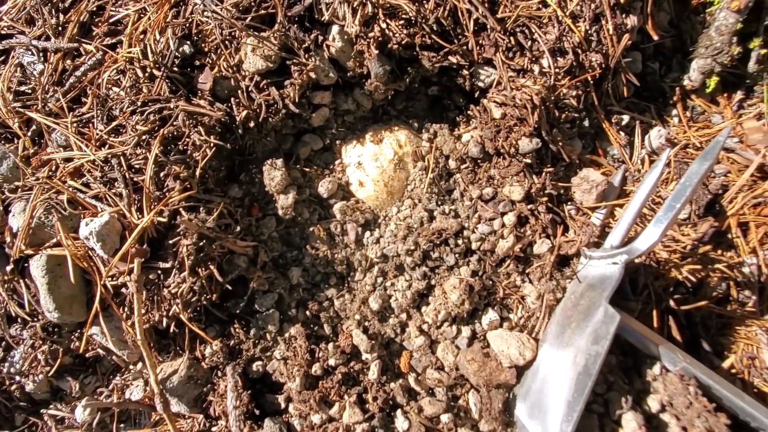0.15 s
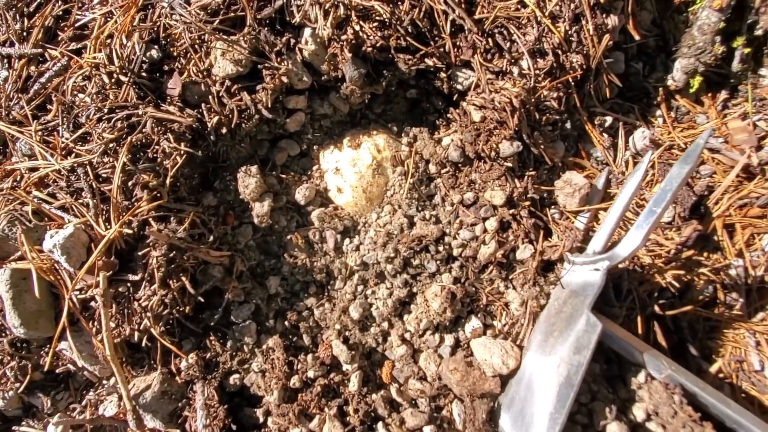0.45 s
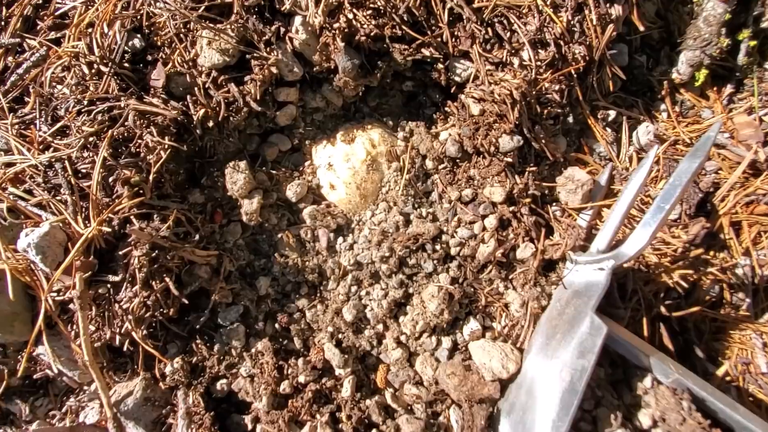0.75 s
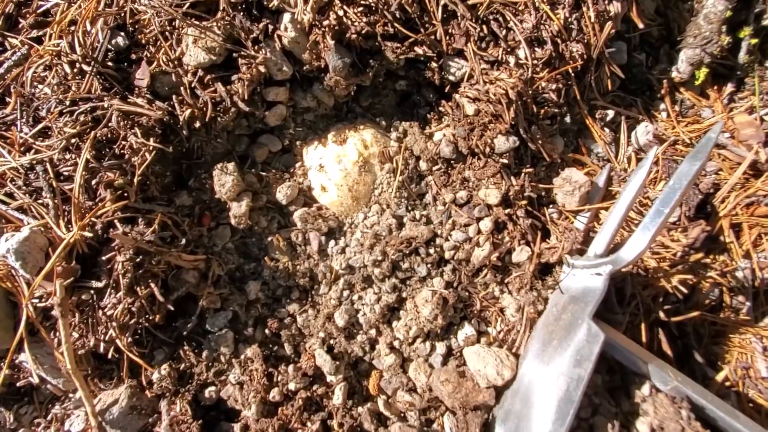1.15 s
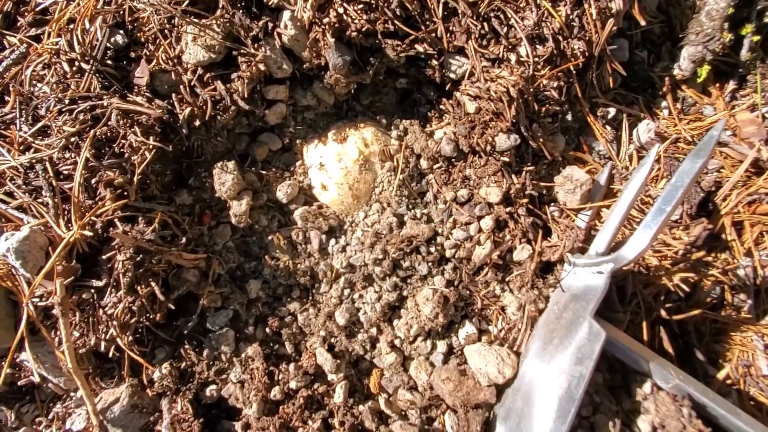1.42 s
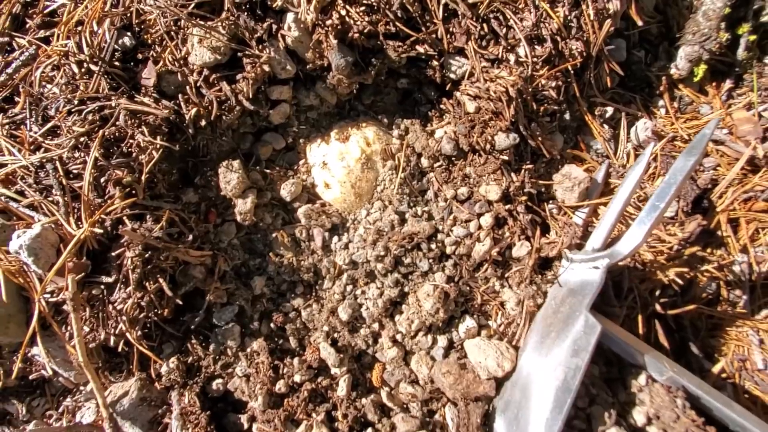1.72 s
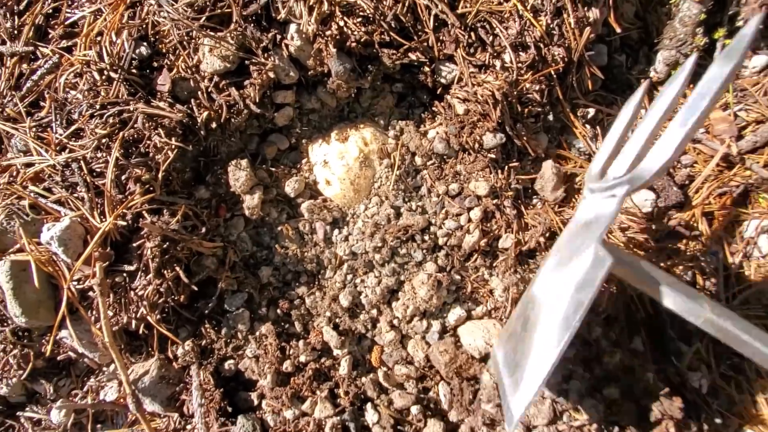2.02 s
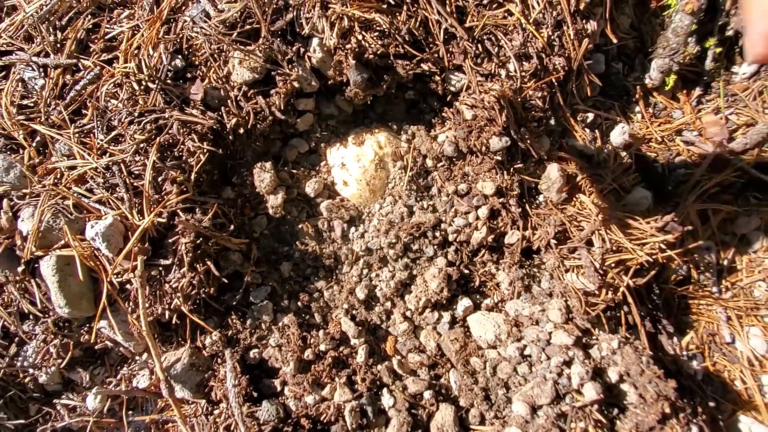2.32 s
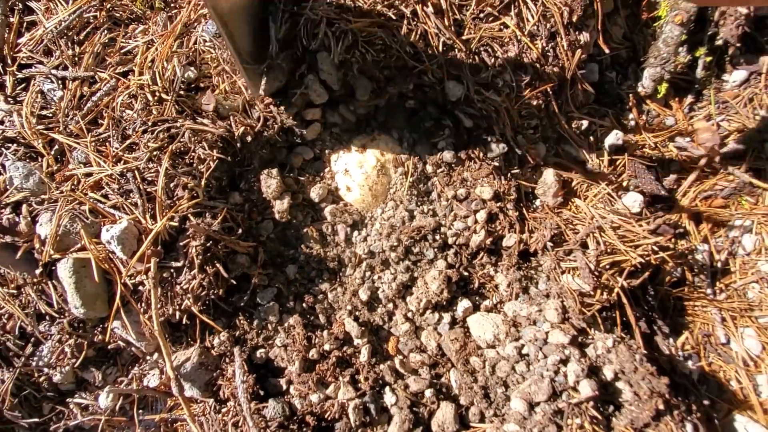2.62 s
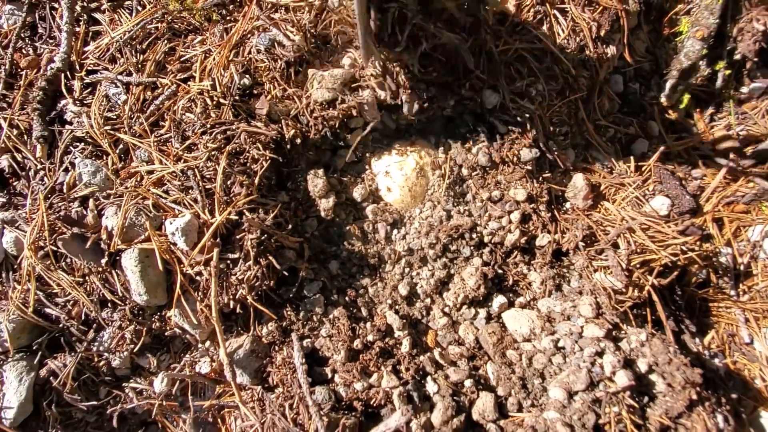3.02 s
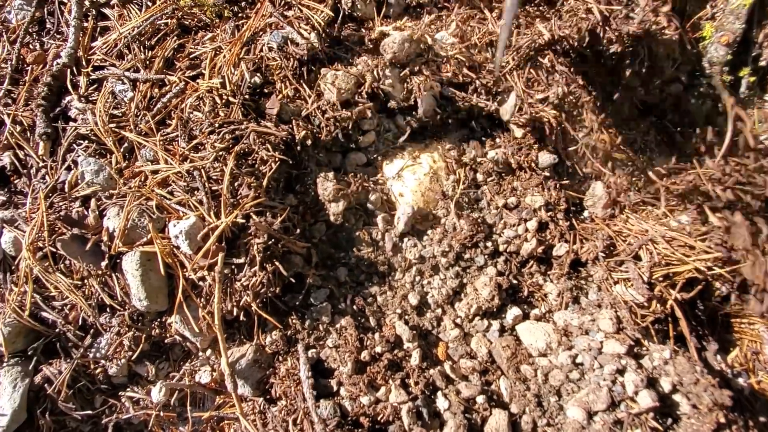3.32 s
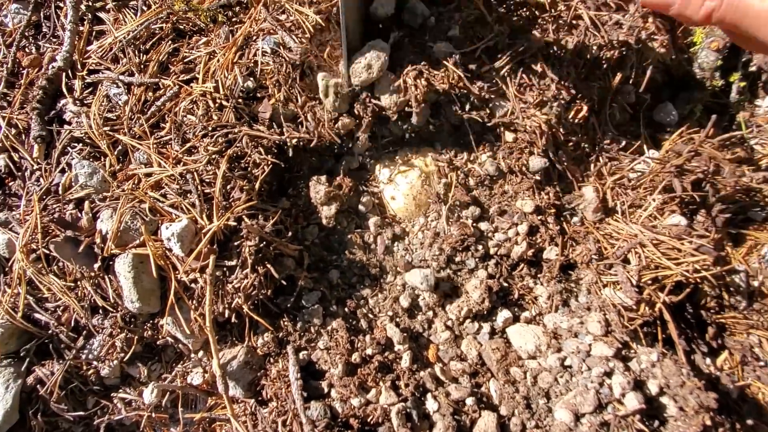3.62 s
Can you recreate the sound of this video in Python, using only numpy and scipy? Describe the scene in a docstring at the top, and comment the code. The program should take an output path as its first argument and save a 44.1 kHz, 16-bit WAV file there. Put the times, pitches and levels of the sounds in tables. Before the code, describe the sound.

Metal garden tool crunches and scrapes in stony soil, following quiet shuffling and one clink.

```python
"""Scraping the forest floor

Close to the ground outdoors: someone shifts on gritty soil at the right, made of dense filtered clicks and snaps.
The hand-held microphone takes low bumps, which are short swelling sine cycles, over quiet filtered noise.
A steel hand tool is lifted, knocked, then scraped through grit and dry needles at the left:
uneven clicks and cracks drive the steel's decaying modes, so that it rings as it goes."""
import sys
import numpy as np
from scipy import signal
from scipy.fft import rfft, irfft, next_fast_len
from scipy.io import wavfile
from scipy.ndimage import uniform_filter1d

SR = 44100
rng = np.random.default_rng(int(sys.argv[2]) if len(sys.argv) > 2 else 0)


def unload_wav(signal):
    """Save mono or channel-first audio to the path in sys.argv[1] as 16-bit WAV at rate SR, clipped to [-1, 1]."""
    wavfile.write(
        sys.argv[1],
        SR,
        np.round(np.clip(np.atleast_2d(signal).T, -1, 1) * 32767).astype(np.int16),
    )


def makeup_ratio(level_db):
    """Linear amplitude ratio for a level in decibels (20 dB per factor of ten)."""
    decades = np.asarray(level_db, float) / 20
    return 10 ** decades


N = 165375  # samples
TOOL_LAG = 3  # samples by which the left microphone hears the tool first
TOOL_PAN_DB = 7  # left over right


def evened(x):
    """Scales to rms 1."""
    return x / np.sqrt(np.mean(x ** 2) + 1e-20)


def peak(x):
    """Scales to peak 1."""
    return x / abs(x).max()


def colour(x, points):
    """Causal minimum-phase filter with the given spectrum, scaled to unit energy."""
    f, db = np.transpose(points)
    hz = abs(np.fft.fftfreq(4096, 1 / SR))
    wanted_db = np.interp(np.log(hz + 1), np.log(f + 1), db)
    log_gain = np.log(makeup_ratio(np.maximum(wanted_db, -100)))
    taps = np.fft.ifft(np.exp(signal.hilbert(log_gain))).real[::-1]
    taps = np.roll(taps, 1)[:2048]
    return signal.oaconvolve(x, taps / np.linalg.norm(taps))[:len(x)]


def curve(table, order):
    """One column of a table, joined by straight lines in time."""
    rows = np.array(table)
    return np.interp(np.arange(N) / SR, rows[:, 0], rows[:, order])


def level(table):
    """Gain over time from the first two columns (seconds, dB), silent outside the table."""
    t = np.arange(N) / SR
    inside = (t >= table[0][0]) & (t <= table[-1][0])
    return makeup_ratio(curve(table, order=1)) * inside


def ring(modes):
    """Half a second of decaying sines, one for each mode of a struck body."""
    t = np.arange(SR // 2) / SR
    return sum(makeup_ratio(db - 60 * t / t60) * np.sin(2 * np.pi * hz * t) for hz, db, t60 in modes)


def burst(t60):
    """A crack: noise dying fast."""
    t = np.arange(4000) / SR
    return rng.standard_normal(len(t)) * makeup_ratio(-60 * t / t60)


def grains(per_s, spread_db, hiss, clump_db=5):
    """Sparse clicks of very uneven size, arriving in clumps over a fine hiss."""
    clump = makeup_ratio(clump_db * evened(uniform_filter1d(rng.standard_normal(N), 300)))
    size = makeup_ratio(spread_db * np.minimum(rng.exponential(1, N), 5))
    size = size * rng.choice([-1, 1], N)
    clicks = size * (rng.random(N) < per_s * clump / SR)
    return evened(evened(clicks) + hiss * clump * rng.standard_normal(N))


def add(mix, s, sound):
    """Mixes a sound in at a time."""
    part = mix[max(round(s * SR), 0):][:len(sound)]
    part += sound[:len(part)]


def sides(pan_db):
    """Left and right gains around the middle level; positive leans left."""
    left = makeup_ratio(np.asarray(pan_db) / 2)
    return np.array([left, 1 / left]) * 2 / (left + 1 / left)


def add_panned(pair, s, sound, pan_db):
    """Mixes a sound into both sides at a time."""
    for mix, gain in zip(pair, sides(pan_db)):
        add(mix, s, gain * sound)


def spread(x, gains, lag_s):
    """Direct sound, a part scattered differently to each side, and the ground echo; positive lag delays the left."""
    apart = .25  # share that differs between microphones
    echo_db, echo_t60_s = -13, .06
    t = np.arange(4000) / SR
    out = []
    for gain, late in zip(gains, (max(lag_s, 0), max(-lag_s, 0))):
        near = rng.standard_normal(len(t)) * makeup_ratio(-60 * t / 0.0064)
        echo = rng.standard_normal(len(t)) * makeup_ratio(-60 * t / echo_t60_s)
        taps = apart * near / np.linalg.norm(near) + makeup_ratio(echo_db) * echo / np.linalg.norm(echo)
        taps[0] += 1
        taps = np.r_[np.zeros(round(late * SR)), taps / np.linalg.norm(taps)]
        out.append(gain * signal.oaconvolve(x, taps)[:N])
    return np.array(out)


# Colour of the quiet air. Each row: frequency in Hz, relative level in dB per Hz.
AIR_COLOUR = [(15, -38), (25, 0.5), (76, 0.5), (591, -13.5), (714, -9.5), (1020, -19.5), (6560, -27),
              (7310, -30), (8360, -26), (13200, -33.5), (16000, -42)]


def air():
    """The quiet of the forest floor: steady coloured noise, unrelated at the two microphones."""
    return makeup_ratio(-71) * np.array([evened(colour(rng.standard_normal(N), AIR_COLOUR)) for _ in range(2)])


def rumble():
    """A faint lumpy rumble: low noise whose level wanders, almost all at the right."""
    lumps = makeup_ratio(5.2 * evened(uniform_filter1d(rng.standard_normal(N), 2500)))
    low = colour(rng.standard_normal(N), [(20, -40), (62 * 0.24, -8), (62, 0), (62 * 2.3, -12), (400, -50)])
    return makeup_ratio(-69) * evened(low * lumps) * sides(-31)[:, None]


def low_cycles(rows, pan_db):
    """A few low cycles of wavering pitch that swell and die."""
    rise, wobble = 0.19, 0.26  # swell time as a share of the length; pitch sway as a share of the pitch
    out = np.zeros((2, N))
    for start, db, hz, length in rows:
        u = np.arange(0, 2, 1 / SR / length)  # time in lengths
        sway = np.sin(2 * np.pi * (1.11 * u + rng.random()))
        turns = np.cumsum(hz * (1 + wobble * sway)) / SR
        shape = (u / rise) * np.exp(1 - u / rise)
        shape = shape * np.minimum((u[-1] - u) / .3, 1)  # fades to nothing at the end
        add_panned(out, start, makeup_ratio(db) * shape * np.sin(2 * np.pi * turns), pan_db)
    return out


# Low bumps from the hand. Each row: start in seconds, level in dB, middle pitch in Hz,
# length in seconds (the sound lasts two lengths).
HAND_BUMPS = [(0.153, -49.5, 72.5, 0.038), (0.27, -44, 83, 0.049), (0.498, -49, 91, 0.098),
              (0.765, -51.5, 71, 0.038), (0.863, -52.5, 59.3, 0.039), (0.912, -53, 62, 0.053),
              (1.023, -43, 62, 0.036), (1.491, -48, 63, 0.094), (1.576, -51, 54.4, 0.064),
              (1.743, -47.5, 62, 0.08), (2.498, -45.5, 68, 0.087), (2.576, -48, 59, 0.067),
              (2.651, -50, 54, 0.098)]


def hand_bumps():
    """The hand knocks the right microphone, which gives short low swells."""
    return low_cycles(HAND_BUMPS, pan_db=-35)


# Jolts of the tool through the ground. Each row: start in seconds, level in dB, middle pitch in Hz,
# length in seconds (the sound lasts two lengths).
GROUND_JOLTS = [(2.271, -33, 73, 0.065), (3.02, -50, 77, 0.049), (3.086, -34.5, 113, 0.02),
                (3.116, -42, 89, 0.044), (3.174, -34.5, 81.6, 0.044), (3.474, -49, 62, 0.078),
                (3.555, -43.5, 88.5, 0.033), (3.587, -45.5, 63.4, 0.11), (3.683, -37, 84, 0.082),
                (3.703, -31.5, 89.6, 0.055)]


def jolts():
    """The ground carries the tool's jolts to both microphones as short low swells."""
    return low_cycles(GROUND_JOLTS, pan_db=-2)


# Clods giving way. Each row: start in seconds, peak level in dB, left over right in dB.
CLOD_THUDS = [(0.001, -29, -38), (0.267, -43.5, 4), (0.475, -54, -30), (1.022, -54.5, -30),
              (1.148, -48, -39), (1.98, -45, -32), (2, -39.5, -38), (2.264, -30.5, -31), (2.943, -47, -17),
              (3.022, -48.5, -21), (3.087, -35.5, -5), (3.128, -36.5, -10), (3.401, -60, -28),
              (3.556, -32.5, 1.5), (3.694, -32.5, -3), (3.735, -32.5, 3)]
# Dull colour of breaking clods. Each row: frequency in Hz, relative level in dB.
CLOD_COLOUR = [(100, -12.5), (180, 4.5), (450, 1.5), (900, -8.5), (1800, -25), (4000, -31)]


def thuds():
    """Clods give way with a dull thud: filtered noise dying fast."""
    out = np.zeros((2, N))
    for s, db, pan_db in CLOD_THUDS:
        add_panned(out, s, makeup_ratio(db) * peak(colour(burst(0.055), CLOD_COLOUR)), pan_db)
    return out


# Dry needles rustling back into place. Each row: time in seconds, level in dB.
NEEDLE_EFFORT = [(.26, -95), (.29, -68), (.33, -70), (.45, -72), (.55, -91), (1.25, -88), (1.44, -76),
                 (1.55, -81), (1.665, -85), (1.675, -64.5), (1.75, -66.5), (1.86, -72.5), (1.88, -68.5),
                 (2.05, -63), (2.12, -54), (2.135, -67), (2.19, -70), (2.22, -58), (2.255, -79),
                 (2.28, -51), (2.37, -65), (2.40, -75), (2.52, -97)]
# Bright colour of the needles. Each row: frequency in Hz, relative level in dB per Hz.
NEEDLE_COLOUR = [(880, -54), (1500, -21), (4500, -12.5), (6000, -3), (7540, -17), (8160, -4.5), (10800, 3),
                 (16000, -7.5)]


def needles():
    """Dry needles rustle back into place: fine bright clicks, separate at each side."""
    pair = [evened(colour(grains(4000, 3.4, 0.71, clump_db=4.0), NEEDLE_COLOUR)) for _ in range(2)]
    return pair * level(NEEDLE_EFFORT)


# Weight shifting over soil. Each row: time in seconds, effort in dB.
SHUFFLE_EFFORT = [(0, -37.5), (.03, -66.5), (.07, -82), (.26, -107), (.29, -55), (.33, -67), (.38, -57),
                  (.45, -65.5), (.49, -58), (.55, -55), (.61, -39.5), (.66, -44.5), (.76, -49), (.84, -62),
                  (.87, -70.5), (1.0, -89), (1.15, -80), (1.18, -65.5), (1.2, -61.5), (1.216, -68),
                  (1.232, -62), (1.25, -89), (1.65, -103), (1.9, -74), (2.01, -60), (2.08, -65.5),
                  (2.25, -101), (2.28, -58), (2.36, -62.5), (2.5, -95)]
# Twigs and grit snapping under that weight. Each row: start in seconds, peak level in dB.
WEIGHT_SNAPS = [(0.001, -33), (0.269, -45), (0.287, -45), (0.478, -33), (0.503, -40), (0.577, -45),
                (0.898, -53.5), (1.021, -52), (1.11, -60), (1.148, -47), (1.176, -53), (1.229, -55)]
# Dull colour of soil under weight. Each row: frequency in Hz, relative level in dB per Hz.
SOIL_COLOUR = [(80, -19.5), (200, -6), (500, -1.5), (1500, -5.5), (2600, -4.5), (4300, -14.5), (5700, -27),
               (8300, -30), (10500, -27), (16000, -38)]


def shuffle():
    """Dense dull grit under weight with single snaps; the left microphone hears it weaker and later."""
    x = level(SHUFFLE_EFFORT) * evened(colour(grains(9000, 2.4, 1.6, clump_db=2.0), SOIL_COLOUR))
    for s, db in WEIGHT_SNAPS:
        add(x, s, makeup_ratio(db) * peak(colour(burst(.007), SOIL_COLOUR)))
    return spread(x, sides(-15), lag_s=23 / SR)


# Modes of the tool held free in the air. Each row: frequency in Hz, level in dB, decay to -60 dB in seconds.
FREE_MODES = [(479, 0, .09), (824, -9, .08), (1308, -25, 2.5), (1367, -20, 1.8), (2299, -3, .3),
              (3300, -8, .04), (9000, -6, .03), (12250, -12, .12), (12510, -2, .08), (13850, 1, .2),
              (14030, -24, 1)]
# Dull wooden part of the knock. Each row: frequency in Hz, relative level in dB.
WOOD_COLOUR = [(120, -5.5), (250, -4.5), (800, -1.5), (1500, -53), (4000, -18)]


def knock():
    """One knock of the tool held free: a crack, a dull wooden body and the long ring of undamped steel."""
    start_s, ring_db, crack_db, wood_db = 2.2665, -37, -30, -36.5
    bell, hit = np.zeros((2, N))
    add(bell, start_s, makeup_ratio(ring_db) * ring(FREE_MODES))
    add(hit, start_s, makeup_ratio(crack_db) * peak(colour(burst(0.079), GRIT_COLOUR)))
    add(hit, start_s, makeup_ratio(wood_db) * peak(colour(burst(0.27), WOOD_COLOUR)))
    gains = sides(8.5)
    bells = gains[:, None] * np.array([bell, np.roll(bell, TOOL_LAG)])
    return spread(hit, gains, -TOOL_LAG / SR) + bells


# Colour of grit along the blade. Each row: frequency in Hz, relative level in dB per Hz.
GRIT_COLOUR = [(60, -16), (150, -10), (400, -15.5), (800, -12.5), (1500, -16.5), (2400, -11), (3300, -4),
               (5900, -8), (8100, -7.5), (12300, 0), (14000, -2), (15600, -11), (16500, -56)]
# Modes of the sliding tool. Each row: frequency in Hz, level in dB,
# decay to -60 dB in seconds before damping.
SLIDING_MODES = [(3280, -9, .12), (5380, -10, .1), (5850, -16, .05), (7900, -10, .12), (9930, -11, .1),
                 (12255, -3, .12), (13855, 0, .2)]


def rubbed(drive, ring_db, damping):
    """Grit noise plus the steel modes it sets going; damping scales their decay times."""
    steel = ring([(hz, db, t60 * damping) for hz, db, t60 in SLIDING_MODES])
    ringing = signal.oaconvolve(drive, steel / np.linalg.norm(steel))[:N]
    return colour(drive, GRIT_COLOUR) + makeup_ratio(ring_db) * ringing


# The tool sliding off its rest. Each row: time in seconds, effort in dB.
LIFT_EFFORT = [(1.93, -74), (1.96, -62), (1.975, -50.5), (1.99, -54.5), (2.005, -50), (2.04, -62.5),
               (2.065, -66), (2.08, -75)]


def lift():
    """The tool slides off its rest, the rubbing making it ring openly."""
    drive = grains(2500, 3.6, .5) * level(LIFT_EFFORT)
    return spread(rubbed(drive, ring_db=6.3, damping=0.97), sides(TOOL_PAN_DB), -TOOL_LAG / SR)


# The blade meeting a stone. Each row: start in seconds, level in dB, extra ring of the tines in dB.
STONE_HITS = [(2.8273, -44, -8), (3.014, -36.5, -4), (3.0814, -33.5, 5), (3.4021, -33, 5.5),
              (3.4345, -43, 16), (3.5296, -36, -17), (3.556, -34.5, 14.5), (3.6837, -35, 13),
              (3.6979, -28, -7)]
# Modes of the blade on stone. Each row: frequency in Hz, level in dB, decay to -60 dB in seconds.
STONE_MODES = [(2270, -1, .03), (3278, -2, .025), (5383, -5, .02), (5830, -2, .015)]
# Modes of the tines. Each row: frequency in Hz, level in dB, decay to -60 dB in seconds.
TINE_MODES = [(9938, -16, .04), (12260, -10, .05), (13850, -9, .11)]


def stones():
    """The blade meets stones: short steel rings with a varying share of the tines."""
    x = np.zeros(N)
    for s, db, tines_db in STONE_HITS:
        add(x, s, makeup_ratio(db) * (ring(STONE_MODES) + makeup_ratio(tines_db) * ring(TINE_MODES)))
    return spread(x, sides(TOOL_PAN_DB), -TOOL_LAG / SR)


def crumble():
    """Clods break along the scrape: sparse clicks filtered to a low rumble, in the middle."""
    return makeup_ratio(-19.5) * colour(grains(300, 2.3, 0.56) * level(SCRAPE_EFFORT), CLOD_COLOUR)


# The tool dragged through the ground. Each row: time in seconds, effort in dB, left over right in dB.
SCRAPE_EFFORT = [(2.5, -89, 11), (2.53, -58, 14), (2.555, -41, 24), (2.572, -53, 2), (2.595, -40.5, 13.5),
                 (2.64, -42, 14), (2.652, -46, 5), (2.665, -41.5, 13), (2.795, -39, 10), (2.81, -45, 6),
                 (2.87, -46, 4), (2.94, -50, 5), (2.98, -45, 9), (3.02, -34.5, 1), (3.06, -34.5, 4),
                 (3.12, -35, 4), (3.19, -38, -2.5), (3.22, -52, 6.5), (3.29, -57, 6.5), (3.32, -57, 5),
                 (3.397, -59, 4), (3.405, -39.5, 7), (3.44, -43.5, 1), (3.46, -46.5, 0), (3.485, -38, 16),
                 (3.51, -52, 7), (3.54, -41.5, -1), (3.56, -32, 10), (3.59, -42, 3), (3.675, -41, 3),
                 (3.69, -31, 7.5), (3.72, -33.5, -1), (3.75, -23, 5)]
# Sharp bright clicks: two snaps as the person shifts, then grains and twigs snapping near the blade. Each row:
# start in seconds, level in dB, left over right in dB.
SHARP_TICKS = [(1.443, -51, 13), (1.6743, -49, 14), (1.971, -32, 23), (2.152, -48, 13), (2.5431, -28, 24),
               (2.591, -23, 23), (2.6553, -28, 25), (2.6993, -36, 12), (2.7574, -22, 15),
               (2.7813, -28, -14), (2.796, -28.5, 1), (2.9644, -26.5, 21), (3.0115, -18, 27),
               (3.1743, -17, 30), (3.351, -56, 5), (3.4706, -28, 11), (3.487, -31, 5), (3.543, -25, 11),
               (3.553, -20, -1), (3.6834, -7, 2), (3.7371, -16, 6)]


def scrape():
    """Grit crunches along the blade and rings the soil-damped steel; each microphone hears partly its own grains."""
    shared = 0.27  # share of grain power heard by both sides
    both, left, right = (grains(2500, 3.6, .5) for _ in range(3))
    pair = np.array([np.sqrt(shared) * both + np.sqrt(1 - shared) * own for own in (left, right)])
    pair = pair * level(SCRAPE_EFFORT) * sides(curve(SCRAPE_EFFORT, order=2))
    for s, db, pan_db in SHARP_TICKS:
        add_panned(pair, s, makeup_ratio(db) * peak(burst(.005)), pan_db)
    # in soil the steel rings weaker and shorter
    dug = [rubbed(side, ring_db=-5, damping=0.12) for side in pair]
    return np.array([spread(dug[k], [1, 1], -TOOL_LAG / SR)[k] for k in range(2)])


def scene():
    """All sources, from the background to the scraping tool."""
    background = air() + rumble() + hand_bumps() + jolts() + thuds()
    person = needles() + shuffle()
    return background + person + knock() + lift() + stones() + crumble() + scrape()


def low_pass(x):
    """Removes everything above the highest recorded frequency."""
    return signal.sosfilt(signal.butter(12, 16650, fs=SR, output="sos"), x)


def record(dry):
    """The microphone housing dips each side's treble, and a steep edge limits the band."""
    size = next_fast_len(N)
    hz = np.fft.rfftfreq(size, 1 / SR)
    left_dip = makeup_ratio(-14 * np.exp(-((hz - 7250) / 300) ** 2))
    right_dip = makeup_ratio(-12 * np.exp(-((hz - 7600) / 600) ** 2))
    band_edge = 1 / (1 + (hz / 15900) ** 80)
    mix = irfft(rfft(dry, size) * np.array([left_dip, right_dip]) * band_edge, size)[:, :N]
    return low_pass(mix)


dry = scene()
out = record(dry)
unload_wav(out)
```